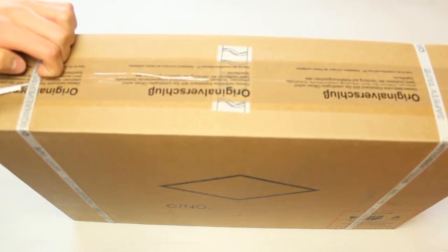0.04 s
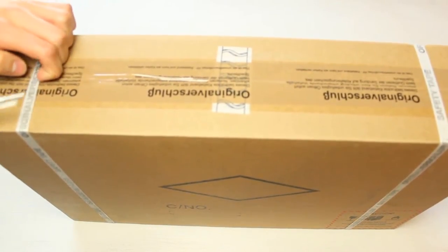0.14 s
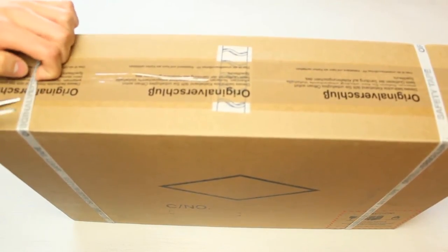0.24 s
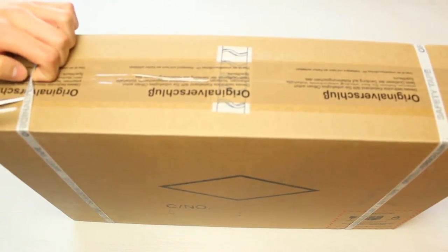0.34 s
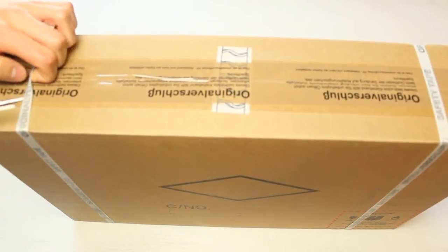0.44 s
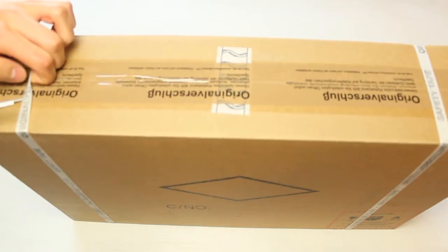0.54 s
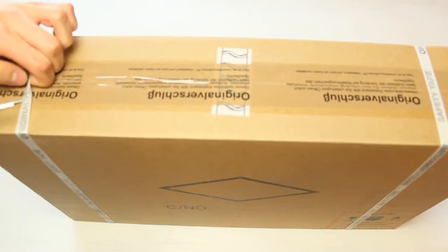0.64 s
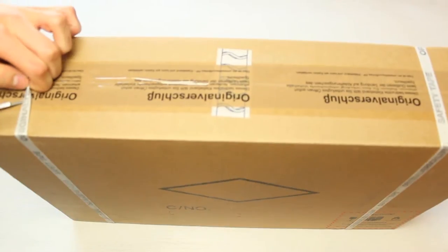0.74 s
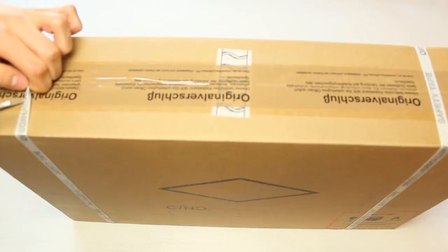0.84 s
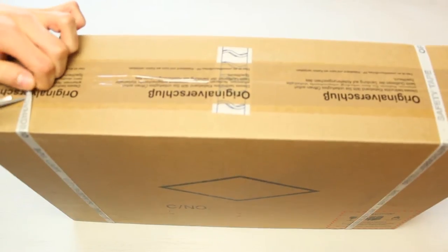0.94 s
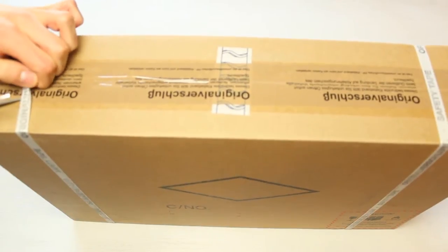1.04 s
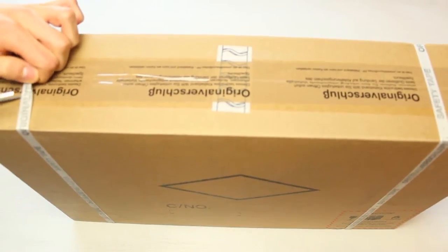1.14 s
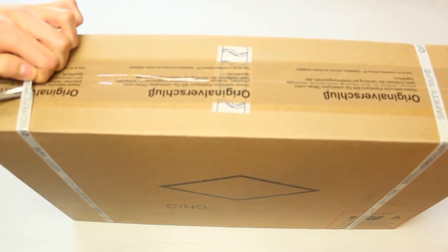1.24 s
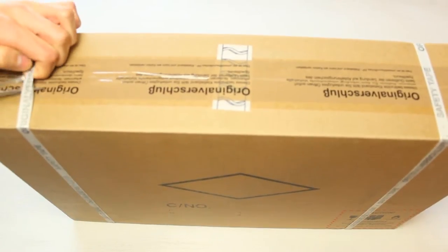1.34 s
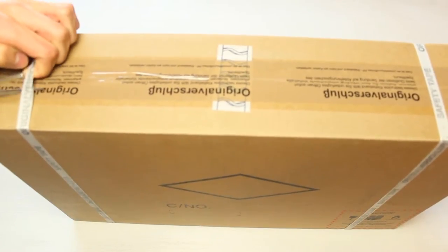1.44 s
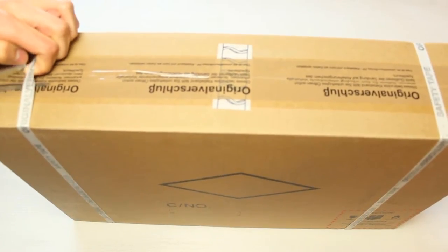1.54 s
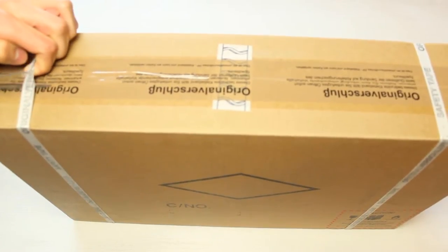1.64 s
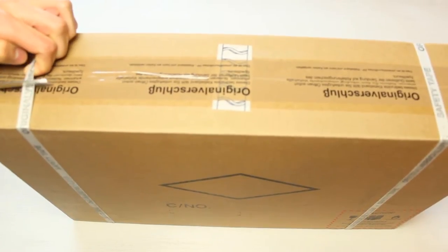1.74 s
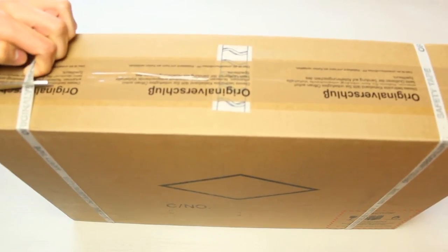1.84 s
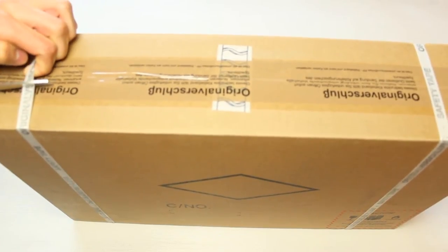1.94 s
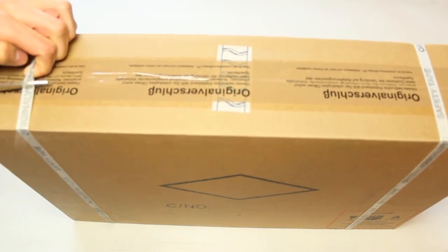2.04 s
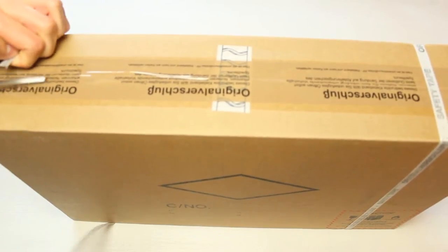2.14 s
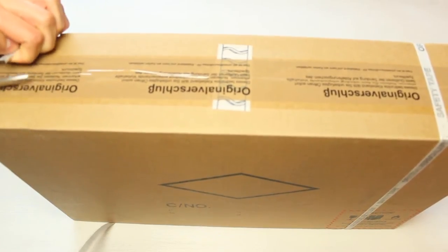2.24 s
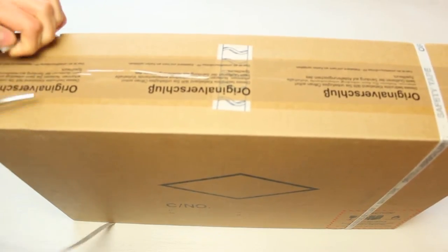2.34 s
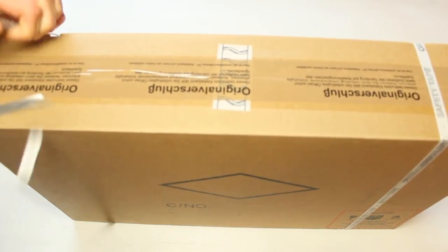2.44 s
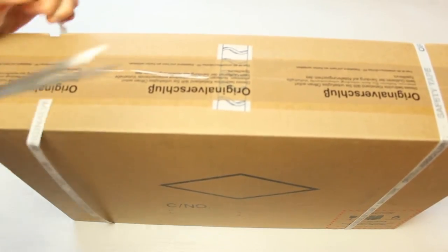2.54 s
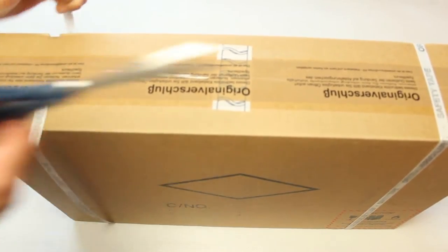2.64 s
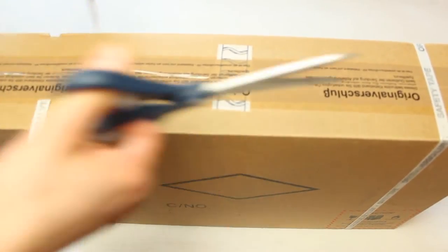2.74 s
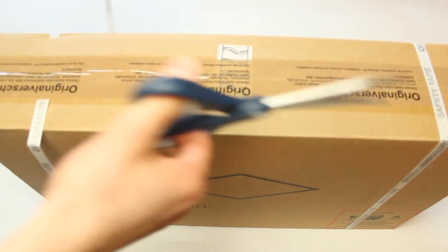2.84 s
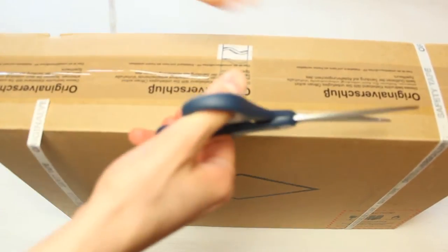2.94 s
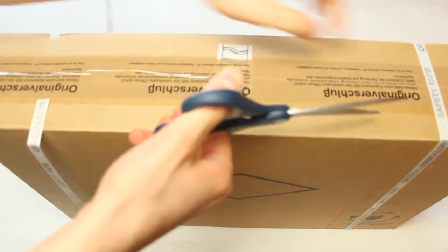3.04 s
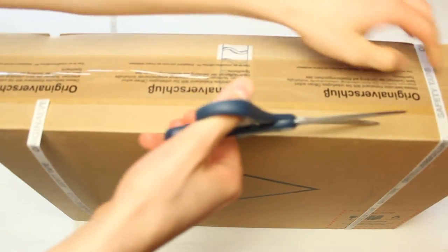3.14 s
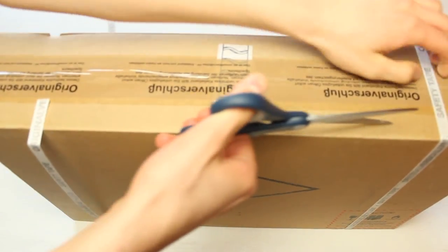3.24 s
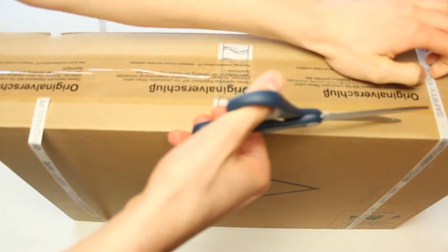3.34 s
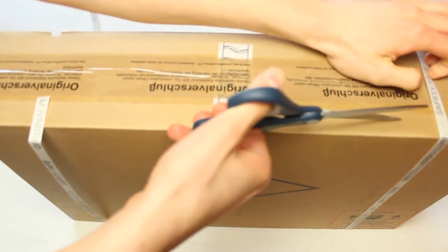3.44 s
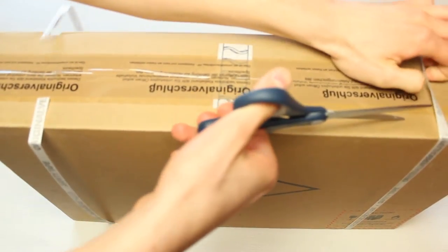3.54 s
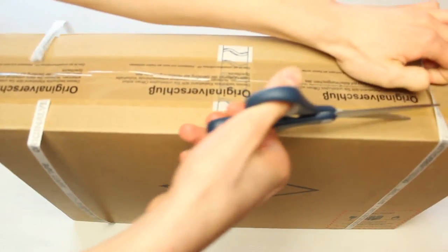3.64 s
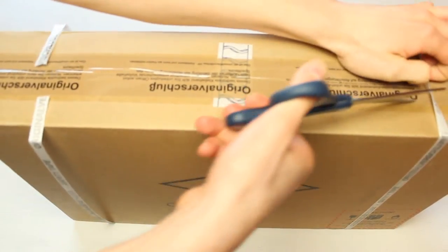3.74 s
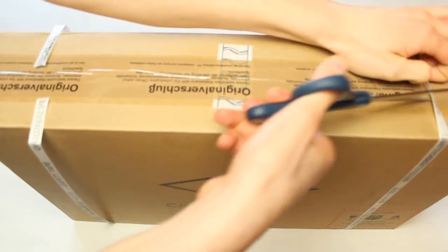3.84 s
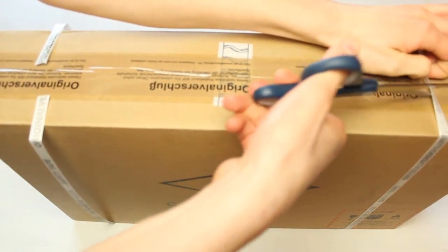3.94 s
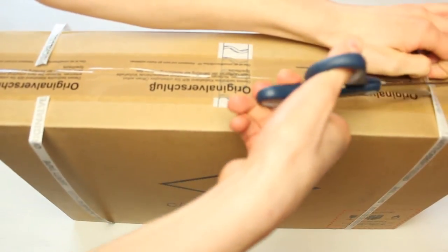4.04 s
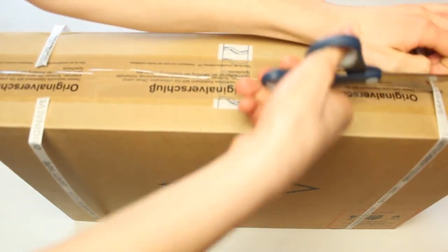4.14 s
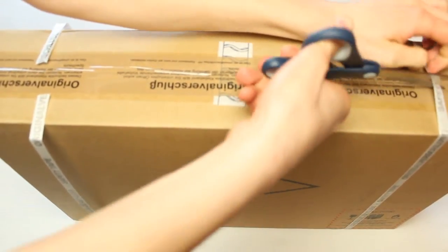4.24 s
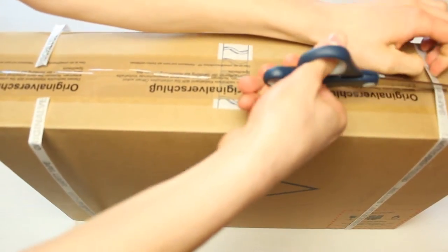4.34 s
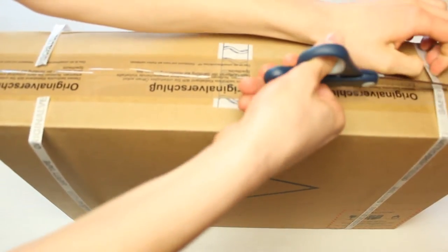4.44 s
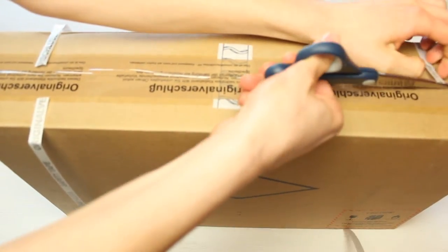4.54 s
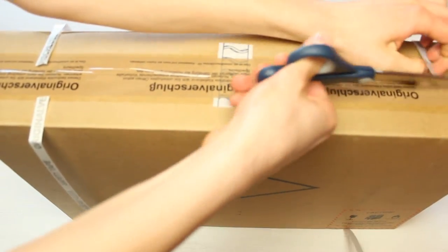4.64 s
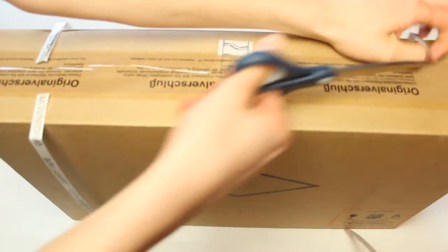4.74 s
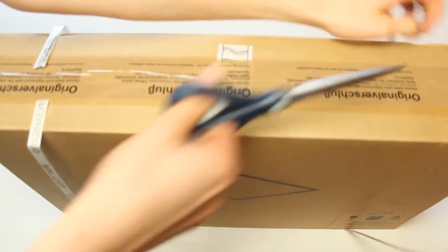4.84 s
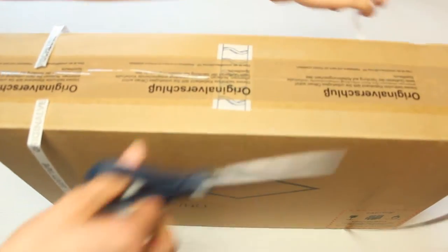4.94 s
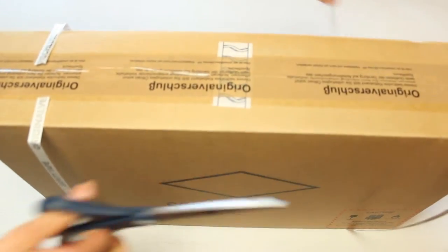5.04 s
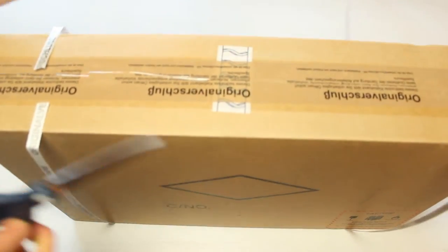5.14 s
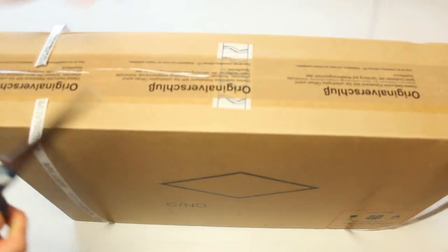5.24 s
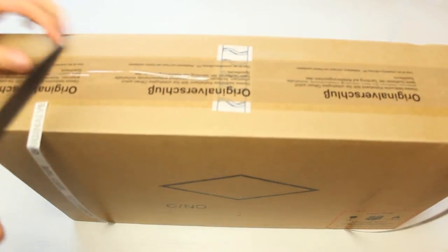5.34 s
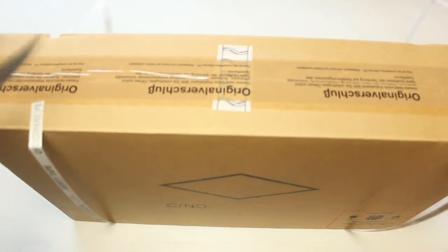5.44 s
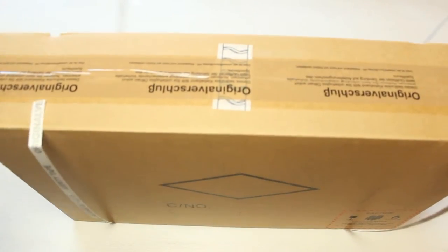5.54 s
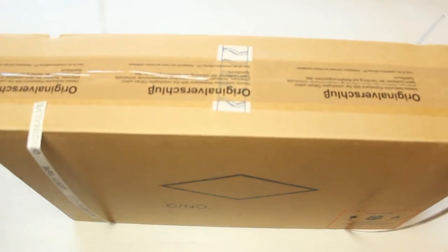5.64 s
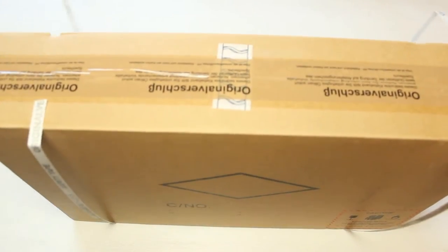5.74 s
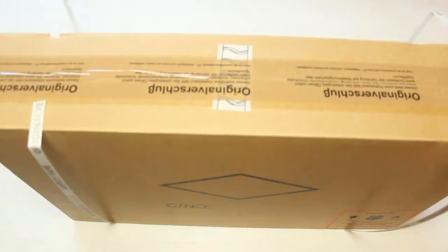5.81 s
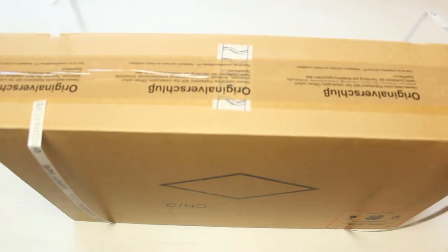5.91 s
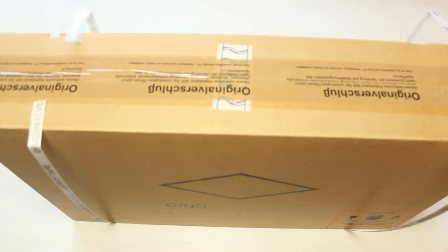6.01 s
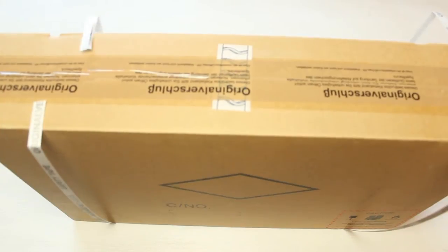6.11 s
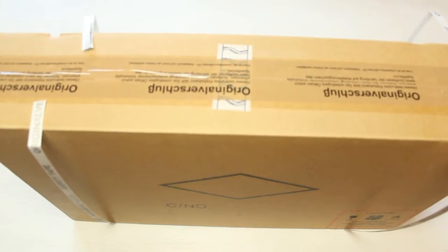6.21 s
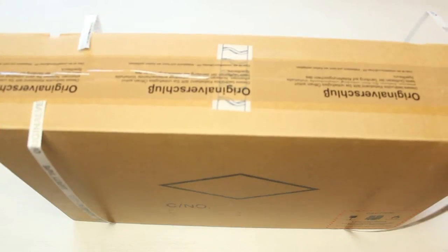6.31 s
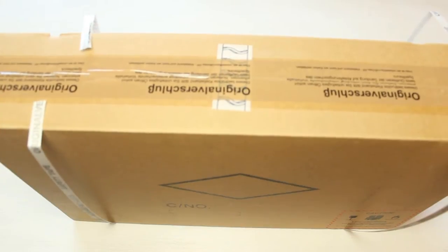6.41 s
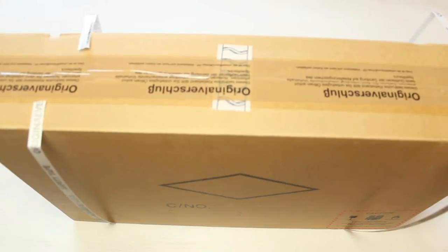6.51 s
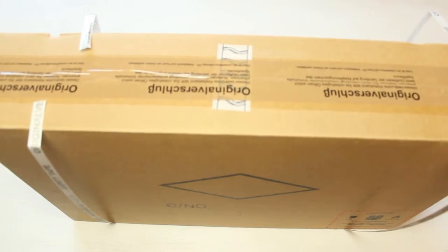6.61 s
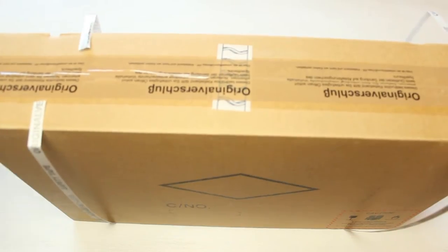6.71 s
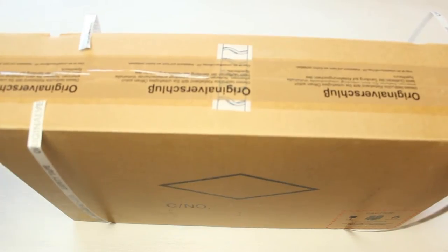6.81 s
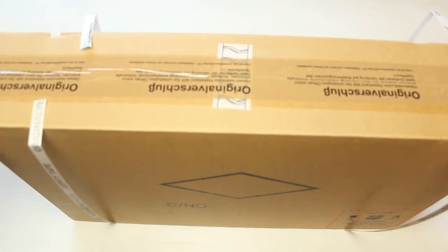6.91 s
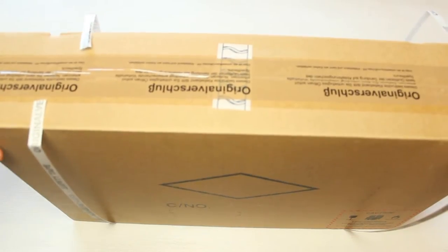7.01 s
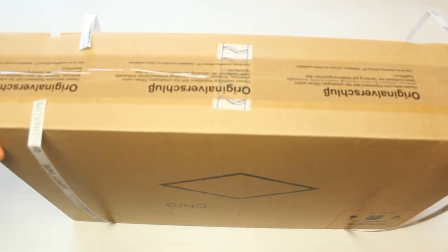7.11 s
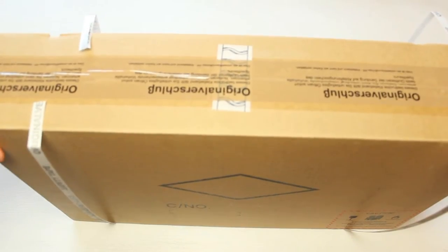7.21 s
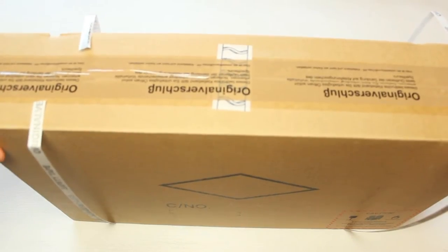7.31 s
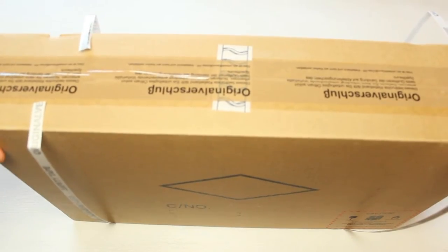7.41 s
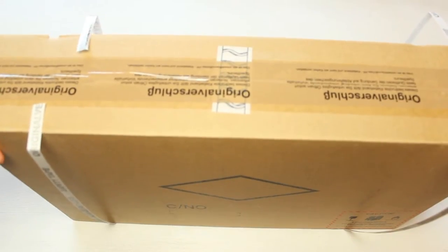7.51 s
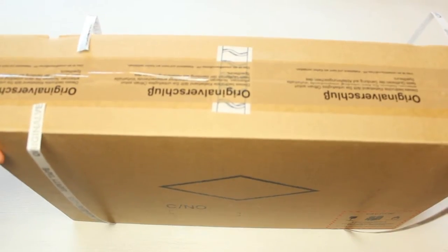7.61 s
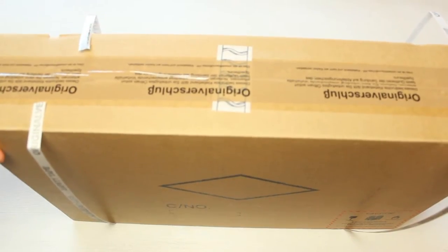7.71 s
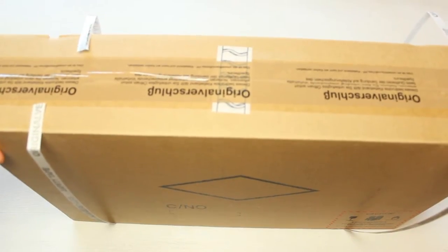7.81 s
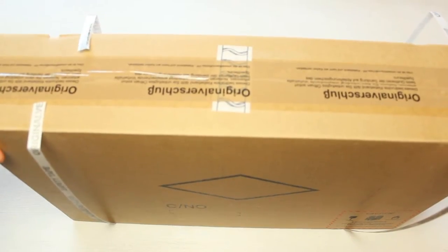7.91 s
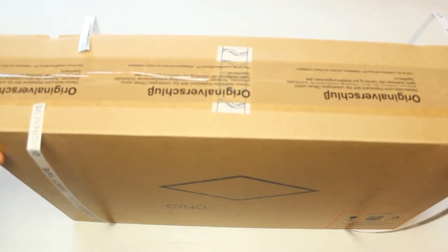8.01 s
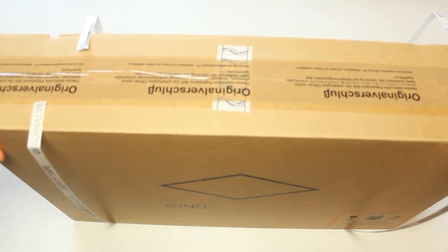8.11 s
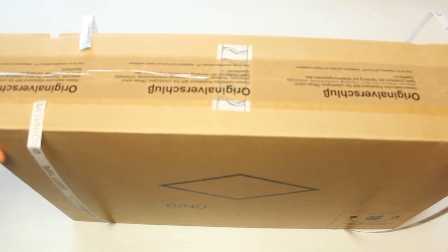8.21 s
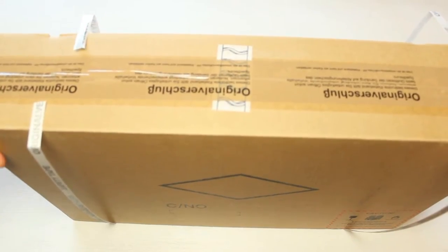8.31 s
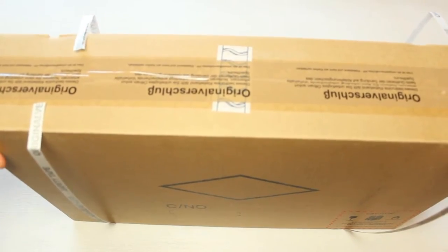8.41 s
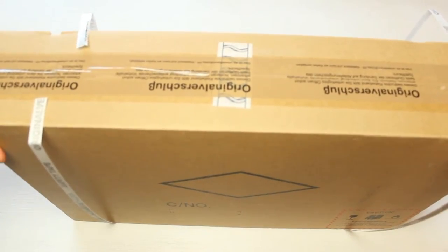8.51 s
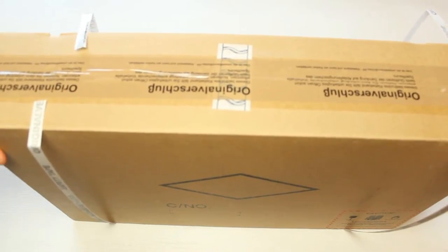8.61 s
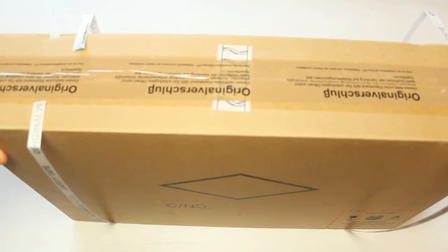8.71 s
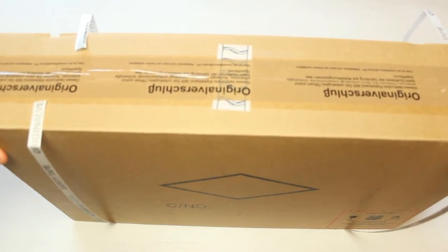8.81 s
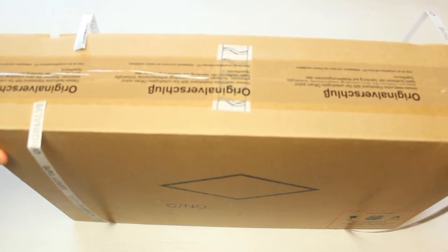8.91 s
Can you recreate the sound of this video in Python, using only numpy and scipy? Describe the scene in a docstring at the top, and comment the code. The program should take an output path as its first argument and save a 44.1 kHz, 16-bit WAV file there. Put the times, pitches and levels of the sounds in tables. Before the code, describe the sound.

Scissors work at the plastic straps around a cardboard box in a small, hard room. Light ticks and a sharp metal snip lead to a loud snap as the first strap parts. Hands rub and the blades click until a second strap snaps. A dull thump on the table follows, then quieter scrapes, knocks and bumps, all heard close over a faint hiss.

```python
"""Small hard room: scissors are worked under two plastic straps round a cardboard carton and snap them.
Each contact knocks the carton, cracks in the plastic and ticks on the blade edges. The taut strap pings;
the steel blades clack and ring. Hands and clothes rub and rustle between, with a few narrow scrapes,
and the table thumps now and then. Impacts echo briefly over a steady hiss."""
import sys
import numpy as np
from scipy import signal
from scipy.fft import rfft, irfft, next_fast_len
from scipy.io import wavfile
from scipy.ndimage import uniform_filter1d

SR = 44100
rng = np.random.default_rng(int(sys.argv[2]) if len(sys.argv) > 2 else 0)


def unload_wav(signal):
    """Save mono or channel-first audio to the path in sys.argv[1] as 16-bit WAV at rate SR, clipped to [-1, 1]."""
    wavfile.write(
        sys.argv[1],
        SR,
        np.round(np.clip(np.atleast_2d(signal).T, -1, 1) * 32767).astype(np.int16),
    )


N = 395136

# noise floor (frequency [Hz], relative density [dB])
HISS_SPECTRUM = [(15, -39), (25, -4.5), (76, 0.5), (300, -5.5), (1130, -20), (1400, -20), (4600, -27.5),
                 (10100, -29.5), (14700, -35.5), (16000, -36.5)]
# hand and sleeve strokes (middle [s], length [s], rumble [dB], rub on cardboard [dB], rustle [dB])
HAND_STROKES = [(0.056, 0.21, -56, -63.5, -74), (0.305, 0.46, -78, -67, -65),
                (0.877, 0.54, -57.5, -66, -80), (1.29, 0.43, -57, -70, -74), (1.536, .24, -71, -60, -69.5),
                (1.799, 0.29, -47.5, -45.5, -82), (2.611, 0.54, -54.5, -49.5, -55.5),
                (2.93, 0.41, -48.5, -64, -76), (3.24, 0.52, -48.5, -66, -69.5),
                (3.46, 0.59, -57, -58.5, -61.5), (3.725, 0.34, -56, -52.5, -68),
                (4.058, 0.4, -50.5, -55, -75.5), (4.123, 0.097, -51, -43.5, -43),
                (4.308, 0.36, -48, -51.5, -64), (4.78, 0.59, -55, -54, -65), (5.18, 0.45, -40, -47, -67),
                (5.473, 0.28, -49, -43.5, -53.5), (5.675, 0.51, -73, -51.5, -70.5),
                (6.08, 0.27, -62, -69.5, -66.5), (6.804, 0.8, -49, -62.5, -75),
                (7.557, .17, -79, -57.5, -68), (7.745, 0.23, -60.5, -55, -64),
                (7.951, .36, -61, -49.5, -57.5), (8.213, 0.43, -45, -46.5, -71),
                (8.707, 0.27, -59.5, -64, -76.5)]
# friction resonances (frequency [Hz], width [Hz], relative gain [dB])
RUMBLE_PEAKS = [(71, 60, -2.5), (129, 80, -2), (212, 230, -1.5), (341, 70, -6.5)]
RUB_PEAKS = [(262, 81, -2), (372, 160, 6), (660, 610, 3.5), (920, 1100, -2), (1600, 910, -4),
             (2400, 1000, -11)]
RUSTLE_PEAKS = [(3760, 3700, 4), (7000, 4300, 2), (11200, 13000, 1)]
# narrow scrapes (start [s], end [s], level [dB], pitch [Hz])
SCRAPE_STROKES = [(0.026, 0.263, -57, 586), (5.073, 5.326, -68, 6870), (5.55, 5.717, -63.5, 6950),
                  (5.596, 5.8, -55.5, 1045), (7.69, 7.796, -53, 393), (7.857, 8.118, -52.5, 396),
                  (7.883, 8.06, -63, 720)]
# blade, strap and carton contacts (time [s], knock [dB], hollow clack [dB], tick [dB], contact [ms])
CONTACT_HITS = [(0.063, -59, -67, -55.5, 2.04), (0.17, -50.5, -55.5, -61.5, 1.96),
                (0.385, -56.5, -62, -56, 2.6), (0.567, -47, -50.5, -57.5, 1.45),
                (0.6655, -57, -48, -45, 0.92), (0.9319, -49.5, -56.5, -66, 2.2),
                (1.0055, -59, -69, -55.5, 2.8), (1.0435, -35, -43, -25, 1.7),
                (1.2677, -51, -58.5, -51.5, 9.1), (1.478, -54, -64, -54, 18), (1.71, -56, -57.5, -58, 2.4),
                (1.8407, -46.5, -58, -62.5, 1.5), (1.993, -50.5, -56, -59, 1.6),
                (2.0007, -32.5, -42, -44.5, 2.6), (2.0192, -30.5, -43.5, -48.5, 2.9),
                (2.0444, -28, -48, -40, 2.6), (2.0741, -25.5, -31, -24, 4), (2.0819, -15, -17, -13.5, 5.75),
                (2.0918, -11.5, -15, -29, 3.6), (2.5628, -47.5, -49, -48.5, 3.2),
                (3.165, -41.5, -41, -59.5, 3.1), (3.2388, -57, -51, -70, 2.8),
                (3.3246, -41.5, -36, -44.5, 8), (3.4045, -44.5, -51, -36, 0.41),
                (3.4142, -63, -41, -54, 0.46), (3.427, -62, -65, -45, 0.53), (3.4568, -53, -71, -46, 0.7),
                (3.494, -68, -62, -59, .5), (3.5446, -56, -54.5, -41, 0.84),
                (3.6702, -44.5, -44.5, -53, 12.5), (3.8835, -48.5, -44, -51, 2.06),
                (3.9817, -34.5, -36, -41, 2.24), (4.0679, -47, -55.5, -48.5, 1.5),
                (4.1397, -46, -48, -42, 2.5), (4.1687, -44, -41, -34, 1.67), (4.306, -35, -49.5, -51, 6.4),
                (4.467, -27, -33, -34.5, 4.9), (4.4975, -8.5, -18, -19.5, 3.65),
                (4.504, -16.5, -19, -19, 2), (4.5106, -24, -25.5, -29.5, 2.8),
                (4.7938, -50, -52.5, -50.5, 1.35), (4.927, -32, -45, -58, 1.5),
                (4.9578, -49, -32, -52.5, 1.22), (5.3136, -48, -53.5, -49, 1.46),
                (5.3342, -50, -49, -48, 2), (5.398, -36.5, -42.5, -38.5, 3),
                (5.4146, -31.5, -36, -34, 10.6), (6.0101, -67, -66.5, -54, 2.73),
                (6.4399, -55, -55.5, -58, 2.55), (8.112, -44.5, -49, -50, 13.5),
                (8.1513, -36, -35, -36, 3.6), (8.1641, -33.5, -33.5, -41, 13.6),
                (8.696, -49.5, -60, -63.5, 2.24)]
# carton, hollow clack, plastic and blade edge resonances (frequency [Hz], width [Hz], relative gain [dB])
CARTON_PEAKS = [(240, 210, -4), (410.4, 160, 0.5), (538, 100, 1), (693.4, 310, -3), (946, 250, -4),
                (1315, 370, -3)]
HOLLOW_PEAKS = [(1529, 470, 1.5), (1935, 710, -1.5)]
CRACK_PEAKS = [(2690, 1000, 3), (3320, 1200, 0.5), (4140, 2300, -4)]
TICK_PEAKS = [(5657, 5800, -5), (7550, 4500, 0.5), (9100, 3400, -0.5), (11650, 3300, -4.5)]
# echo decay (band centre [Hz], t60 [s], relative gain [dB])
ROOM_BANDS = [(125, 0.52, -9), (248, 0.38, -7), (490, 0.47, -11.5), (980, .4, -7), (1940, 0.45, -7),
              (4030, 0.4, -4.5), (7900, .34, -6), (14000, 0.18, -7)]
# taut strap on the blades (time [s], peak [dB], pitch [Hz])
STRAP_PINGS = [(0.5668, -48.5, 2360), (2.0438, -29, 3790), (3.3263, -35, 2690), (3.4048, -29, 5080),
               (3.5443, -54, 5000), (3.8846, -39.5, 3070), (3.9836, -23, 2390), (4.17, -25.5, 5000),
               (4.7945, -43, 2278), (5.3986, -38, 4740)]
# blade on blade (time [s], level [dB], contact [ms])
BLADE_HITS = [(.6654, -50, 1.0), (1.0446, -19.5, 3.1), (2.044, -49, 1.2), (4.1679, -41.5, 2.9),
              (4.4693, -41.5, 1.2)]
# steel ring (frequency [Hz], relative gain [dB], t60 [s])
BLADE_MODES = [(1690, -3, 0.017), (3240, 0, .02), (5340, -5, 0.0054), (7144, -4, 0.0063), (7940, 1, .005),
               (9700, -2.5, 0.0036), (10730, -10, 0.0041), (12310, -10, 0.0068)]
# dull blows through the table (time [s], level [dB], pitch [Hz], t60 [s])
TABLE_THUMPS = [(1.043, -19, 290, 0.019), (4.928, 1, 182, 0.016), (5.145, -33, 270, 0.046),
                (6.194, -40, 161.5, 0.095), (6.574, -30.5, 76.2, 0.075), (6.814, -28, 146, 0.058),
                (6.995, -21, 106.8, 0.056), (7.084, -33, 138, 0.044), (7.37, -44.5, 125, 0.077),
                (7.599, -36.5, 110.4, 0.073), (8.235, -28, 134, 0.056), (8.642, -30.5, 135.7, 0.098)]


def undb(db):
    return 10 ** (np.asarray(db) / 20)


def decay(t, t60_s):
    return np.exp(-np.log(1000) * t / t60_s)


def shaped(x, response):
    """Spectrum of x times response(Hz)."""
    size = next_fast_len(len(x) + SR)
    hz = np.arange(size // 2 + 1) * SR / size + 1e-3
    return irfft(rfft(x, size) * response(hz), size)[:len(x)]


def resonate(x, peaks, order=1):
    """Parallel resonances, alternating sign; unity gain for white noise."""
    def response(f):
        gain = sum((-1) ** k * undb(db) / (1 + 1j * (f / hz - hz / f) * hz / width_hz) ** order
                   for k, (hz, width_hz, db) in enumerate(peaks))
        return gain / np.sqrt(np.mean(np.abs(gain) ** 2))
    return shaped(x, response)


def walk(rate_hz):
    """Random levels, held and slewed."""
    hold = int(SR / rate_hz)
    steps = np.repeat(rng.standard_normal(N // hold + 1), hold)
    return 0.38 * uniform_filter1d(steps, hold)[:N]


def contact_force(times_s, levels_db, contacts_ms, rebound=0.63):
    """Blows scattered into flat-spectrum rattles by five all-pass echoes; energy = level held 10 ms."""
    size = 8192
    force = np.zeros(N + size)
    omega = 2 * np.pi * np.arange(size // 2 + 1) / size
    delay_shares = rng.uniform(.05, .4, (len(times_s), 5))
    for time_s, gain, ms, shares in zip(times_s, undb(levels_db), contacts_ms, delay_shares):
        delays = np.ceil(shares * ms * SR / 1000)
        echo = np.exp(-1j * omega * delays[:, None])
        rattle = irfft(np.prod((echo - rebound) / (1 - rebound * echo), axis=0))
        i = int(time_s * SR)
        force[i:i + size] += gain * np.sqrt(SR / 100) * rattle
    return force[:N]


def hiss(rms_db=-59):
    """Steady room tone and microphone noise."""
    hz, db = np.transpose(HISS_SPECTRUM)
    noise = shaped(rng.standard_normal(N), lambda f: undb(np.interp(np.log(f), np.log(hz), db)))
    return noise * undb(rms_db) / np.std(noise)


def hands(fidget_db=(-66.5, -71.5, -78.5), crackles_per_s=90):
    """Skin, cloth and strap catch and slip in uneven grains: rumble, rub, crackling rustle."""
    t = np.arange(N) / SR
    pressures = undb(fidget_db)[:, None] * np.ones(N)
    for middle_s, length_s, *db in HAND_STROKES:
        on = np.abs(t - middle_s) < length_s / 2
        pressures[:, on] += undb(db)[:, None] * np.cos(np.pi * (t[on] - middle_s) / length_s) ** 2
    spikes = (rng.random(N) < crackles_per_s / SR) * rng.exponential(size=N)
    crackle = 1 + 30 * uniform_filter1d(spikes, size=40)  # ticks of about 1 ms

    def friction(pressure, peaks, grain_depth, grain_hz):
        grains = rng.standard_normal(N) * undb(grain_depth * walk(grain_hz))
        return resonate(pressure * grains, peaks, order=2)

    rumble, rub, rustle = pressures
    return (friction(rumble, RUMBLE_PEAKS, grain_depth=4, grain_hz=25)
            + friction(rub, RUB_PEAKS, grain_depth=2.5, grain_hz=60)
            + friction(rustle * crackle, RUSTLE_PEAKS, grain_depth=2.5, grain_hz=150))


def scrapes(relative_width=0.099):
    """Friction swelling and fading in one narrow resonance: thin and high, or hollow on the carton."""
    out = np.zeros(N + SR)
    for start_s, end_s, db, hz in SCRAPE_STROKES:
        i, size = int(start_s * SR), int((end_s - start_s) * SR)
        noise = resonate(rng.standard_normal(SR // 2), [(hz, relative_width * hz, 0)], order=2)[:size]
        swell = np.sin(np.pi * np.arange(size) / size)
        out[i:i + size] += undb(db) * swell * noise
    return out[:N]


def contacts(boom_offset_db=-4, crack_offset_db=-2, tick_share=.45):
    """Each contact excites carton panels, plastic strap and blade edges."""
    times_s, knock_db, hollow_db, tick_db, contacts_ms = np.transpose(CONTACT_HITS)
    crack_db = crack_offset_db + hollow_db + tick_share * (tick_db - hollow_db)

    def strike(peaks, levels_db):
        return resonate(contact_force(times_s, levels_db, contacts_ms), peaks, order=2)

    boom = strike(CARTON_PEAKS[:2], knock_db + boom_offset_db)  # big panels
    knock = strike(CARTON_PEAKS[2:], knock_db)
    hollow = strike(HOLLOW_PEAKS, hollow_db)
    return boom + knock + hollow + strike(CRACK_PEAKS, crack_db) + strike(TICK_PEAKS, tick_db)


def room(x, gain_db=-24, build_s=0.0028, flutter_period_s=.0092, flutter_depth=0.76, flutter_tau_s=0.06):
    """Dense echoes build up, flutter between near walls and die sooner in the treble."""
    t = np.arange(int(.8 * SR)) / SR
    tail = 0
    for hz, t60_s, db in ROOM_BANDS:
        band = shaped(rng.standard_normal(len(t)), lambda f: np.exp(-np.log2(f / hz) ** 2 * 2))
        tail = tail + undb(db) * band * decay(t, t60_s)
    flutter = 1 + flutter_depth * np.exp(-t / flutter_tau_s) * np.cos(2 * np.pi * t / flutter_period_s)
    build = np.minimum(t / build_s, 1) ** 2
    return signal.fftconvolve(x, undb(gain_db) * tail * flutter * build)[:N]


def strap_pings(t60_s=0.015):
    """One mode, pitched by the free length of strap."""
    out, t = np.zeros(N + SR), np.arange(SR // 10) / SR
    for time_s, db, hz in STRAP_PINGS:
        i = int(time_s * SR)
        out[i:i + len(t)] += undb(db) * np.sin(2 * np.pi * hz * t) * decay(t, t60_s)
    return out[:N]


def blade_clacks():
    """Steel on steel; grip and pivot damp the ring."""
    peaks = [(hz, np.log(1000) / np.pi / t60_s, db) for hz, db, t60_s in BLADE_MODES]
    return resonate(contact_force(*np.transpose(BLADE_HITS)), peaks)


def table_thumps(highpass_hz=60):
    """One low mode, soon damped; the table radiates little deep bass."""
    out, t = np.zeros(N + SR), np.arange(SR // 2) / SR
    for time_s, db, hz, t60_s in TABLE_THUMPS:
        i = int(time_s * SR)
        out[i:i + len(t)] += undb(db) * np.sin(2 * np.pi * hz * t) * decay(t, t60_s)
    return shaped(out[:N], lambda f: 1 / (1 - 1j * highpass_hz / f) ** 2)


def scene(thump_send_db=-11.5):
    """Mono mix; only impacts feed the room."""
    hits = contacts() + blade_clacks() + strap_pings()
    thumps = table_thumps()
    echoes = room(hits + undb(thump_send_db) * thumps)
    return (hits + thumps + echoes + hands() + scrapes() + hiss())[None]


def record(dry):
    """Clip at full scale, then steep low-pass."""
    cutoff_hz = 16050
    lowpass = signal.ellip(12, .2, 90, cutoff_hz, fs=SR, output="sos")
    return signal.sosfilt(lowpass, np.clip(dry, -1, 1))


dry = scene()
out = record(dry)
unload_wav(out)
```